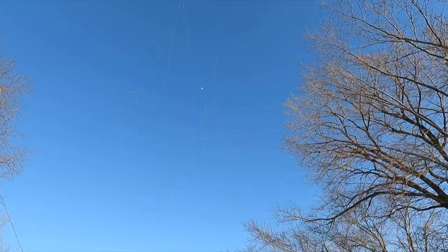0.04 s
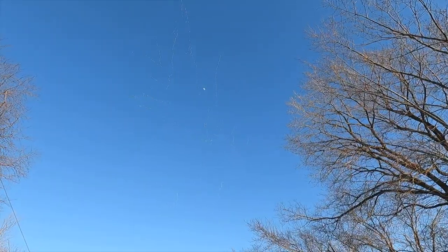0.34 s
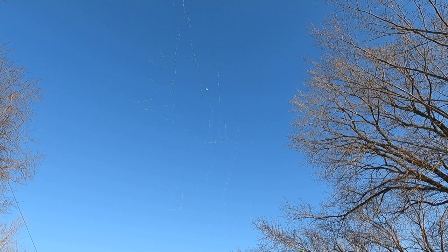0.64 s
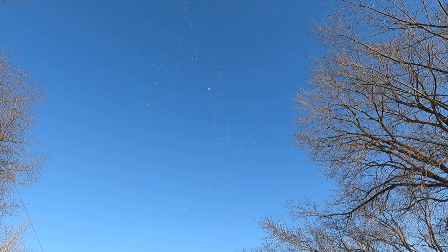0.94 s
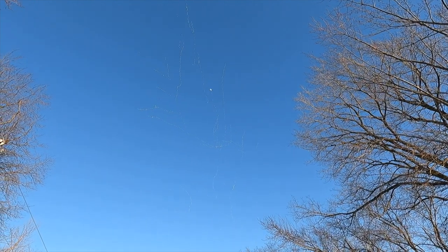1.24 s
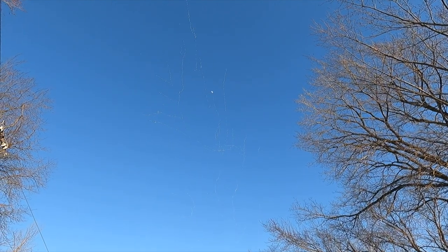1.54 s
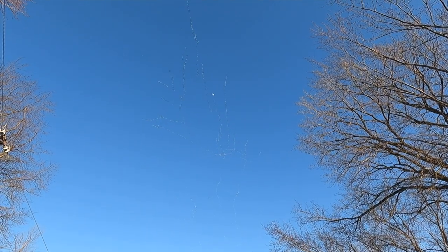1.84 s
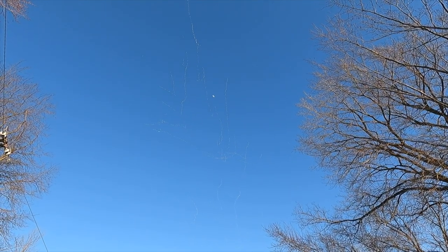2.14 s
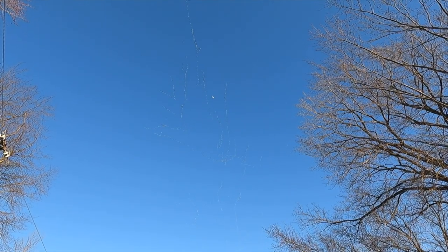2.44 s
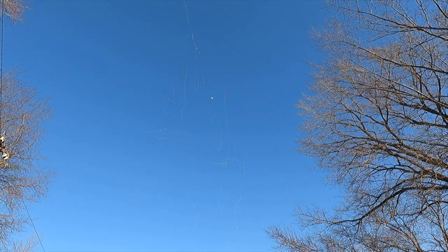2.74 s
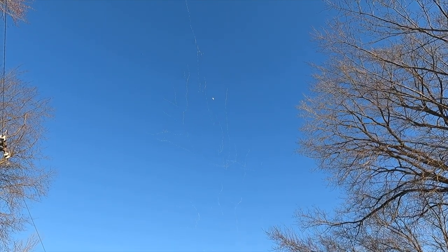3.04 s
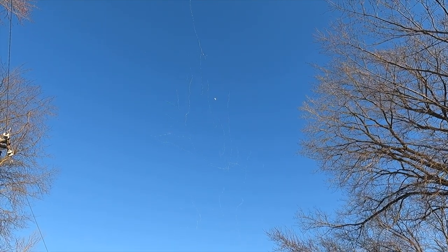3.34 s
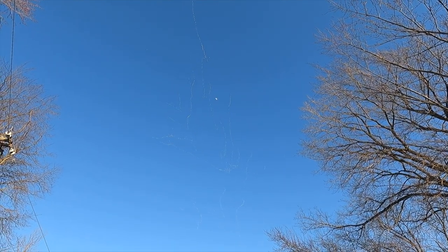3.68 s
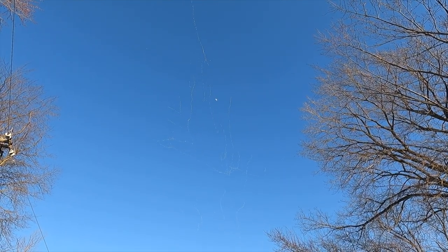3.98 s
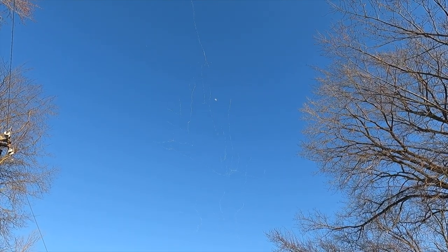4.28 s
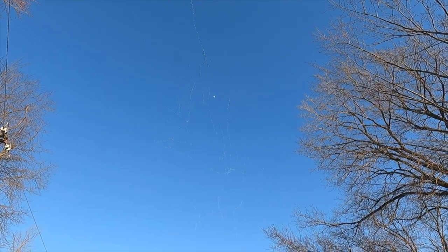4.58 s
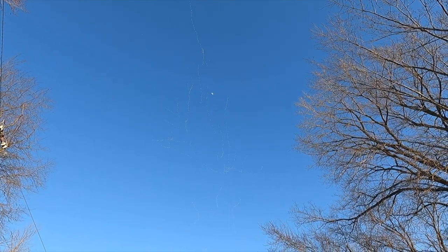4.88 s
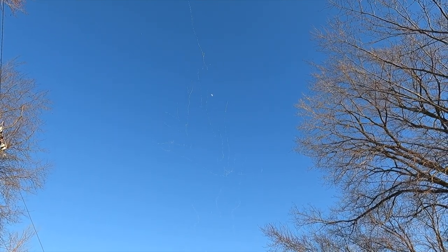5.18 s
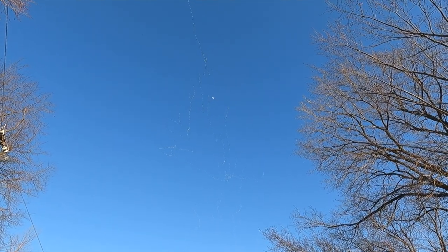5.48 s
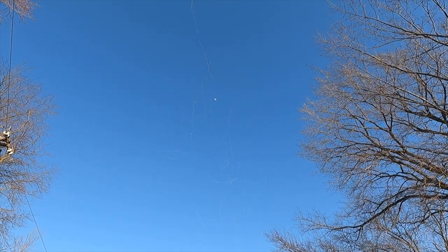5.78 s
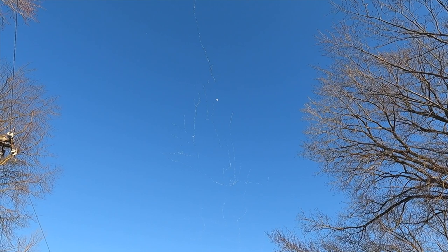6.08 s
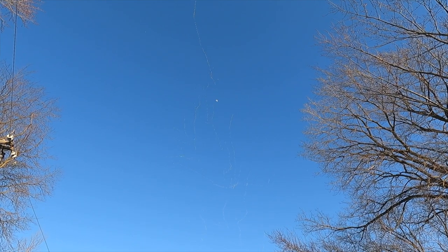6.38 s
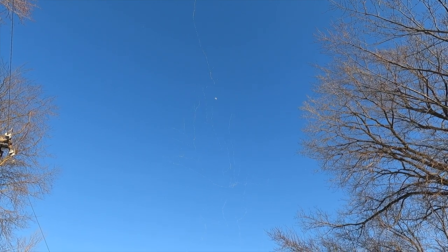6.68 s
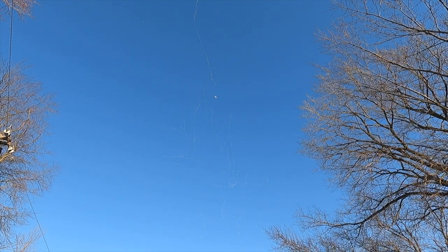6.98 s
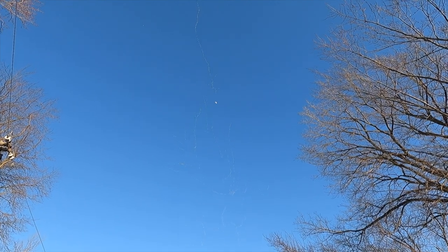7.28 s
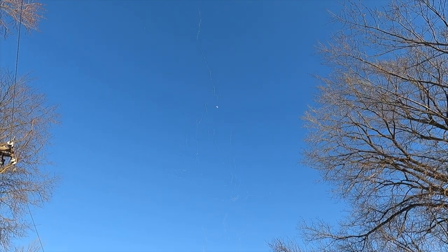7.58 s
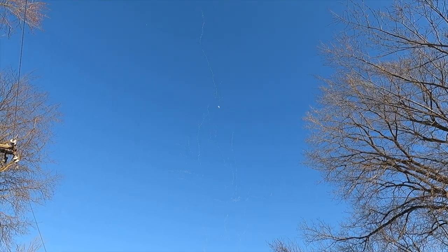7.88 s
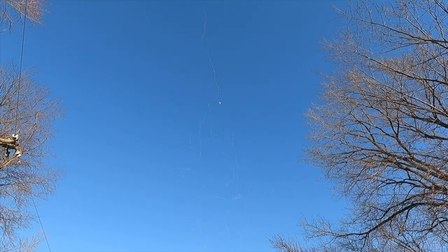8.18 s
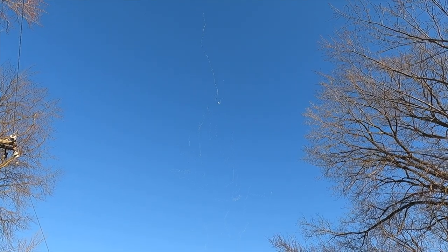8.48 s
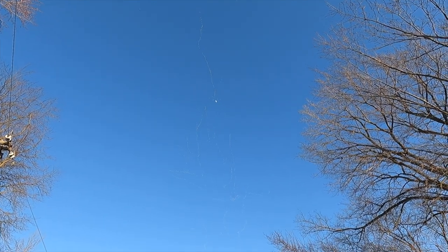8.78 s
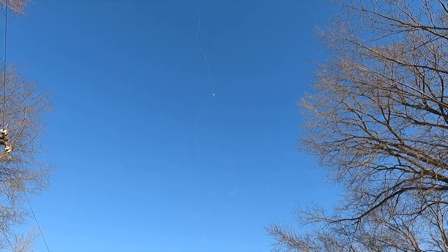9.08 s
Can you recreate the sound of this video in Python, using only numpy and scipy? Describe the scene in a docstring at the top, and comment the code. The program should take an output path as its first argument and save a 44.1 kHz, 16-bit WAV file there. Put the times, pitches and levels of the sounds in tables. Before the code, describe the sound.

Wind buffets the microphone with low, uneven rumbling as many geese honk above the trees.

```python
"""Geese over windy trees

A flock of geese passes high over bare trees, honking in overlapping calls; one voice cracks
into a clear high note. The trees scatter the calls, and the far birds blend into a gabble.
Wind buffets the microphone in lumps and hisses in the twigs, with one strong gust near the end."""
import sys
import numpy as np
from scipy import signal
from scipy.fft import rfft, irfft, next_fast_len
from scipy.io import wavfile
from scipy.ndimage import map_coordinates

SR = 44100
rng = np.random.default_rng(int(sys.argv[2]) if len(sys.argv) > 2 else 0)


def inscribe(sig):
    """Save sig as 16-bit PCM at rate SR to the path in sys.argv[1].

    A 1-D sig is mono; a 2-D sig holds one channel per row.
    Samples are clipped to [-1, 1] before scaling.
    """
    pcm = np.round(np.clip(np.atleast_2d(sig).T, -1, 1) * 32767)
    wavfile.write(sys.argv[1], SR, pcm.astype(np.int16))


N = 411453

# One row per nearby honk. Its crest is the top of its pitch; its partials are the tones stacked in it.
# level_db sets the second partial; fundamental_db shifts the first, reed_db the third to sixth.
# Columns: crest_s, rise_s, fall_s, crest_hz, bend_hz, level_db, fundamental_db, reed_db, roughness
HONKS = [(.01, 0.046, 0.033, 871, 19, -59.5, 4, 8, 0.42), (.183, 0.066, 0.058, 830, 30, -64, -13, -8, 0.72),
         (.28, 0.039, .03, 865, 25, -67, -8, -8, 0.14), (.385, .06, 0.067, 902, 70, -61, -4, -6, 0.25),
         (.455, 0.042, .08, 895, 80, -69, -2, -3, 0.5), (.655, 0.059, 0.046, 943, 58, -63.5, -7, -12, 0),
         (.86, 0.052, 0.03, 838, 10.6, -66, -17, -8, 0.23), (.915, 0.034, 0.14, 890, 36, -68, -2, -3, 0.48),
         (1.3, 0.048, .06, 910, 21.4, -66.5, 0.5, -10, 0.48),
         (1.49, 0.064, 0.064, 915, 40, -64.5, 7, 2, 0.34),
         (1.582, 0.039, 0.027, 898, 90, -61.5, -4.5, -3, 0.25),
         (1.64, .045, 0.038, 945, 70, -63.5, -2, -2, 0.33), (1.69, 0.029, .04, 655, 15, -68, -14, 2, .13),
         (1.77, .02, 0.029, 900, 70, -62, -4, 0, 0.2),
         (1.805, 0.046, 0.073, 953, 130, -63.5, -4.5, -1, 0.2),
         (1.85, .02, 0.03, 770, 33, -66, -5, 3, 0.34), (1.95, .05, .07, 887, 70, -64.5, -1, 1, 0.37),
         (2.02, .02, .025, 765, 14, -64, -4, 4, 0.2), (2.06, .03, 0.033, 587, 29, -65.5, -16, -5, 0.49),
         (2.46, .06, .04, 887, 38, -71, 6, 2, .25), (2.555, .03, 0.037, 890, 100, -65.5, -4, 4, .15),
         (2.625, 0.04, .03, 945, 110, -65.5, -4, 3, 0.2), (2.864, .035, .025, 953, 100, -66, -10, -6, 0),
         (2.96, 0.06, 0.063, 935, 72, -57, -2.5, -3, 0.3), (3.055, .04, 0.074, 905, 34, -69, 3, -5, 0.28),
         (3.21, 0.054, 0.052, 885, 146, -65.5, -12, -13, 0.3),
         (3.27, 0.027, 0.03, 810, 24, -71, -10, -4, 0.2),
         (3.41, 0.066, 0.075, 868, 75, -65.5, 2.5, -10, 0.34),
         (3.63, 0.04, .012, 897, 91, -56, -0.5, 0, 0.25), (3.815, .08, 0.077, 971, 50, -66, 4, 6, 0.59),
         (4.072, 0.021, 0.023, 640, 15, -68.5, -16, -4, 0.2),
         (4.177, 0.066, 0.061, 960, 106, -54.5, -7, -3, 0.13),
         (4.245, .025, 0.026, 850, 42, -67, -7, 4, .3), (4.485, 0.097, .06, 932, 114, -63.5, -6, -2, 0.2),
         (5.003, 0.041, 0.037, 935, 90, -61.5, -3, -1, .2), (5.05, 0.024, 0.052, 895, 56, -65, 1, 1, 0.14),
         (5.15, 0.052, .04, 875, 22, -66, -6, -4, 0.16), (5.178, 0.019, 0.019, 850, 15, -69, 7.5, -4, 0.03),
         (5.238, .02, .03, 750, 10, -72, -6, -4, .1), (5.355, 0.061, 0.063, 957, 100, -60.5, -11, -3, 0.18),
         (5.49, 0.048, .05, 924, 53, -66.5, -5, -2, .35), (5.83, 0.039, .055, 905, 5, -66.5, -9, -2, 0.1),
         (5.903, 0.032, 0.039, 1020, 74, -67.5, 4.5, -2, 0.2),
         (5.995, .055, 0.053, 982, 27, -66, -5, -1, 0.14), (6.09, 0.053, 0.058, 885, 21, -63, -3, -5, 0.56),
         (6.21, .05, 0.028, 925, 45, -64, -4, -4, .1), (6.275, .035, .075, 955, 29, -66.5, -2, -5, 0.16),
         (6.345, 0.047, 0.062, 870, 67, -59.5, -1, -8, 0.32),
         (6.41, 0.029, .03, 815, 34.5, -62.5, 7, -4, 0.35), (6.5, 0.057, 0.027, 875, 46, -67, 9, 3, 0.42),
         (6.635, 0.063, 0.063, 928, 75, -60.5, -1.5, 3, 0.25),
         (7.025, 0.044, 0.057, 1020, 78, -62.5, 6, -6, 0.29),
         (7.075, 0.04, 0.048, 790, 21, -65, -3, 2, 0.28), (7.16, 0.019, 0.027, 593, 45, -63, -10, -3, 0.3),
         (7.19, 0.054, 0.053, 905, 42, -65.5, 0.5, -1, 0.35),
         (7.33, 0.049, 0.045, 1004, 70, -64.5, 1, -1, .1), (7.385, 0.041, 0.062, 820, 29, -69, -3, 4, 0.15),
         (7.657, 0.058, 0.069, 932, 88, -59.5, -13, -1, 0.28),
         (7.795, 0.053, 0.043, 976, 60, -68.5, 4, -2, 0.64),
         (8.095, .028, 0.063, 946, 81, -58, 0.5, 3, 0.33), (8.145, 0.04, 0.033, 990, 30, -63, -1, -2, 0.36),
         (8.215, .03, 0.04, 890, 32, -64, 1, 0, 0.23), (8.45, 0.052, 0.037, 945, 80, -74, 13, -1, 0.25),
         (8.652, .055, 0.059, 980, 106, -64, -11, -1, 0.1),
         (8.825, 0.059, 0.025, 995, 36, -61.5, -1, -3, .06),
         (8.882, .064, 0.031, 942, 80, -51.5, -5.5, -7, 0.17),
         (8.94, 0.029, .04, 920, 31, -67, -7, -5, 0.59), (9.05, 0.029, 0.03, 865, 10, -71, 1, -4, 0.06),
         (9.175, .02, 0.036, 885, 54, -68, -7, 2, 0), (9.255, 0.048, 0.03, 915, 60, -68, 3.5, 4, .26)]
# The throat's colour on a hoarse call. Columns: frequency_hz, level_db
RASP_SPECTRUM = [(400, -35), (750, -6.5), (950, 10), (1300, 2), (1700, 3.5), (2000, -0.5), (2300, -9.5),
                 (3000, -31), (9000, -82)]

def near_geese(voice_db=4.5, rasp_db=18, ground_db=-15):
    """The clearest birds, each heard again off the ground; the hoarsest calls break up into noise."""
    voices, hoarseness = np.zeros(N), np.zeros(N)
    for crest_s, rise_s, fall_s, crest_hz, bend_hz, level_db, fundamental_db, reed_db, rough in HONKS:
        rough = np.clip(rough, 0, 1)
        hz_per_s = bend_hz / max(rise_s, fall_s)  # the longer side of the call bends further
        start_hz, end_hz = crest_hz - hz_per_s * rise_s, crest_hz - hz_per_s * fall_s
        call, envelope = honk(rise_s, fall_s, start_hz, crest_hz, end_hz, fundamental_db, rough, reed_db)
        call = amp(level_db + voice_db) * call
        start_s = crest_s - 1.5 * rise_s  # a soft scoop comes ahead of the loud part
        add(voices, start_s, call)
        add(voices, start_s + rng.uniform(.005, .01), amp(ground_db) * call)
        add(hoarseness, start_s, amp(level_db + rasp_db) * rough ** 2.8 * envelope)
    return voices + hoarseness * noise(RASP_SPECTRUM)


# The second partial weakens as it climbs past the main resonance. Columns: frequency_hz, gain_db
MAIN_RESONANCE = [(1780, 0.5), (2050, -4.5)]
# How the throat's resonances shape the third to sixth partials. Columns: frequency_hz, gain_db
THROAT_RESONANCES = [(2100, -19.5), (2550, -19.5), (2850, -26), (3150, -28.5), (3650, -26.5), (3950, -30),
                     (4350, -24), (5000, -34.5), (6200, -42.5)]

def honk(rise_s, fall_s, start_hz, crest_hz, end_hz, fundamental_db, rough, reed_db,
         waver=.009, jitter=.04, flutter_db=7, fade_db=7, rattle=.55, growl=.85, growl_hz=215):
    """One call and its loudness curve: the pitch scoops up and sags, and the low ends are hoarsest."""
    t = np.arange(-1.5 * rise_s, 1.5 * fall_s, 1 / SR)
    size = len(t)
    away = np.abs(t) / np.where(t < 0, rise_s, fall_s)  # 0 at the crest, 1 at the loud part's edges
    rough = rough * (.9 + .5 * away ** 2)
    pitch_hz = crest_hz - (crest_hz - np.where(t < 0, start_hz, end_hz)) * away ** 1.558
    pitch_hz -= 31.9 * away ** 3  # low air pressure drops both ends further
    pitch_hz *= 1 + waver * wobble(80.9, size) + jitter * rough * wobble(262.3, size)
    phase = phase_of(pitch_hz)
    partials_db = [fundamental_db, along(MAIN_RESONANCE, 2 * pitch_hz)]
    partials_db += [along(THROAT_RESONANCES, k * pitch_hz) + reed_db for k in range(3, 7)]
    # a second, slower vibration puts a growling side tone under each partial
    growl_phase = phase_of(growl_hz * (1 + .15 * wobble(60, size)))
    side_tone = growl * rough * np.exp(-1j * growl_phase)
    voice = np.zeros(size)
    for k, level_db in enumerate(partials_db, start=1):
        # uneven beats of the voice's membrane smear each partial into noise, the high ones most
        smear = rattle * rough * k / 2 * (wobble(450, size) + 1j * wobble(450, size))
        # swirling air makes each partial flicker, the high ones most
        flicker = amp((2 if k < 3 else 4) * wobble(51, size))
        partial = np.real((1 + smear + side_tone * min(k, 2) / 2) * np.exp(1j * k * phase))
        voice += amp(level_db) * unit(flicker * partial)
    to_edge_s = np.minimum(t - t[0], t[-1] - t)
    envelope = amp(-fade_db * away ** 2.5) * np.minimum(to_edge_s / .014, 1)
    flutter = unit(amp(flutter_db * np.minimum(rough, .6) * wobble(155, size)))
    return voice * envelope * flutter, envelope


# The path of the one high note. Columns: time_s, pitch_hz, level_db
CRACKED_NOTE = [(3.625, 1480, -70), (3.642, 1457, -47), (3.675, 1506, -46), (3.697, 1554, -55),
                (3.708, 1440, -48), (3.728, 1230, -65), (3.76, 1190, -90)]

def cracked_note(octave_db=-33, low_voice_db=-28, waver=.0049):
    """One voice jumps up to an almost pure tone, with a trace of its low voice between the partials."""
    pitch_hz, level_db = curves(CRACKED_NOTE)
    t = np.arange(N) / SR
    phase = phase_of(pitch_hz * (1 + waver * wobble(200)))
    sounding = (t > CRACKED_NOTE[0][0]) & (t < CRACKED_NOTE[-1][0])
    tone = np.sin(phase) + amp(low_voice_db) * np.sin(1.5 * phase) + amp(octave_db) * np.sin(2 * phase)
    return amp(level_db) * sounding * unit(tone)


# How the distant gabble swells and fades. Columns: time_s, level_db
FLOCK_LEVELS = [(0.0, -63.5), (1.3, -70), (1.74, -62.5), (2.26, -72), (3.01, -65), (5.22, -68.5),
                (5.69, -73.5), (6.24, -64.5), (6.73, -67.5), (8.94, -65.5), (9.33, -81)]

def far_geese(count=130, typical_hz=900, spread=.055, gain_db=-.5):
    """The rest of the flock: many weak calls, each with its own pitch and length."""
    gabble = np.zeros(N)
    for i, (when, rise, fall, rough) in enumerate(rng.random((count, 4))):
        crest_hz = typical_hz * np.exp(spread * rng.triangular(-6, 0, 1.5))
        call, _ = honk(.04 + .0401 * rise, .04 + .04 * fall, .88 * crest_hz, crest_hz, .84 * crest_hz,
                       fundamental_db=-2.5, rough=.22 + .37 * rough, reed_db=0)
        add(gabble, (i + when - 1) / count * N / SR, call)
    return amp(curves(FLOCK_LEVELS)[0] + gain_db) * unit(gabble)


# How long the echo takes to fade by 60 dB. Columns: frequency_hz, fade_s
ECHO_TIMES = [(500, 0.12), (1800, 0.59), (5000, 0.35)]

def woodland_echo(calls):
    """Trunks and ground scatter the calls into a soft tail."""
    hz, t, spectra = signal.stft(rng.standard_normal(SR), SR, nperseg=256)
    decay = amp(-60 * t / along(ECHO_TIMES, hz)[:, None])
    _, tail = signal.istft(spectra * decay, SR, nperseg=256)
    return signal.fftconvolve(calls, tail / np.linalg.norm(tail))[:N]


# The breeze at the microphone, between gusts. Columns: time_s, rumble_db, buffet_db
BREEZE_LEVELS = [(0, -36, -45), (1, -38.5, -44.5), (1.6, -41, -48.5), (3.4, -40.5, -45), (4.1, -45.5, -48),
                 (4.6, -36.5, -43.5), (5.7, -43, -45.5), (6.2, -36.5, -42.5), (7.25, -42, -49.5),
                 (7.6, -35, -35.5), (7.85, -31.5, -38.5), (7.97, -37, -45), (8.02, -33, -40),
                 (8.5, -34.5, -43), (8.7, -37, -47.5), (9.33, -33, -37.5)]
# The colours of the deep rumble and of the flapping buffet above it. Columns: frequency_hz, level_db
RUMBLE_SPECTRUM = [(8, -28), (22, -0.5), (42, 3), (70, -2), (105, -3), (160, -23), (400, -89.5)]
BUFFET_SPECTRUM = [(50, -21), (110, 1), (200, -2), (300, -12.5), (450, -23), (800, -45), (1500, -64.5),
                   (4000, -120)]

def microphone_wind():
    """Air swirls at the microphone: each lump swells the rumble and, more sharply, the buffeting."""
    rumble_db, buffet_db = curves(BREEZE_LEVELS) + gusts()
    lumps = wobble(40)
    rumble = unit(amp(2 * lumps) * noise(RUMBLE_SPECTRUM))
    buffet = unit(amp(3 * lumps) * noise(BUFFET_SPECTRUM))
    return amp(rumble_db + .5) * rumble + amp(buffet_db) * buffet


# Gusts on top of the breeze. Columns: peak_s, length_s, rumble_rise_db, buffet_rise_db
GUSTS = [(0.32, 0.033, 7.5, 6), (0.844, 0.1, 0, 3.5), (1.192, 0.036, 8, 3.5), (2.14, 0.16, 5, 1),
         (3.816, 0.2, 8, 3), (4.367, 0.094, 5.5, 0), (4.66, 0.099, 1.5, 6), (4.901, 0.1, 6, 5.5),
         (6.05, 0.082, 3.5, 4.5), (6.897, 0.14, 5, 4), (7.401, 0.12, -1, 9.5), (7.738, 0.047, 9, 4.5),
         (8.271, 0.42, 8, 8)]

def gusts():
    """Each gust swells and dies smoothly; gives the decibels added to the rumble and the buffeting."""
    t = np.arange(N) / SR
    return sum(np.outer(rises_db, np.exp(-np.abs(2 * (t - peak_s) / length_s) ** 3 / 2))
               for peak_s, length_s, *rises_db in GUSTS)


# Single whirls of air that hit the microphone. Columns: time_s, relative_level_db
EDDIES = [(0.303, -25.5), (0.562, -31.5), (2.17, -32.5), (3.296, -32), (4.636, -28.5), (4.948, -26.5),
          (6.016, -26), (6.17, -29.5), (7.104, -32.5), (7.424, -25.5), (7.718, -25), (8.0, -22),
          (8.292, -23.5), (8.424, -24.5)]

def eddies(delay_s=.00466, gain_db=3, centre_hz=155):
    """Each eddy gives one short push of pressure between two shallow dips."""
    bumps, t = np.zeros(N), np.arange(-.015, .015, 1 / SR)
    angle = np.pi * centre_hz * t
    push = (1 - 2 * angle ** 2) * np.exp(-angle ** 2)
    for time_s, level_db in EDDIES:
        add(bumps, time_s + delay_s + t[0], amp(level_db + gain_db) * push)
    return bumps


# How the wind in the treetops swells and fades. Columns: time_s, level_db
TREE_WIND_LEVELS = [(0, -59.5), (.9, -62.5), (2.35, -64.5), (2.9, -63), (4.83, -61.5), (5.4, -62.5),
                    (6.4, -59.5), (7.25, -60), (7.7, -56.5), (7.95, -57.5), (8.2, -53.5), (9.0, -55.5),
                    (9.33, -55)]
# The colours of the treetops' rush and of the twigs' hiss. Columns: frequency_hz, level_db
RUSH_SPECTRUM = [(100, -29), (300, 3.5), (480, 1.5), (660, -2.5), (850, 1.5), (1050, -5), (1300, -14.5),
                 (1900, -20.5), (2300, -24), (3500, -30), (9000, -100)]
HISS_SPECTRUM = [(1000, -7), (2500, -2), (4000, 3.5), (5500, 5), (8000, 0), (10000, -5.5), (12000, -15),
                 (13500, -19.5)]

def tree_wind(rush_gain_db=3.5, sway_db=1.2, mean_hiss_db=-74, hiss_follows=.57):
    """Air rushes through the treetops; the hiss of the twigs follows it more gently."""
    rush_db, = curves(TREE_WIND_LEVELS)
    hiss_db = mean_hiss_db + hiss_follows * (rush_db - rush_db.mean())
    rush = amp(rush_db + rush_gain_db + sway_db * wobble(7)) * noise(RUSH_SPECTRUM)
    hiss = amp(hiss_db + .81 * wobble(16)) * noise(HISS_SPECTRUM)
    return rush + hiss


def amp(db):
    """Turn decibels into a multiplier."""
    return 10 ** (np.asarray(db) / 20)


def unit(x):
    """Scale to an average strength (rms) of 1."""
    return x / np.sqrt(np.mean(x ** 2) + 1e-20)


def phase_of(pitch_hz):
    """Add up a changing pitch into the angle of its wave."""
    return 2 * np.pi * np.cumsum(pitch_hz) / SR


def along(points, hz):
    """Read between (frequency_hz, value) points on a log frequency scale."""
    point_hz, values = np.transpose(points)
    return np.interp(np.log(hz + 1), np.log(point_hz + 1), values)


def curves(rows):
    """One value per sample for each column after the time."""
    times_s, *columns = np.transpose(rows)
    return [np.interp(np.arange(N) / SR, times_s, column) for column in columns]


def wobble(rate, size=N):
    """A smooth curve through `rate` random points a second."""
    points = rng.standard_normal(int(size * rate / SR) + 4)
    return map_coordinates(points, [np.arange(size) * rate / SR])


def filtered(x, response):
    """Scale each frequency in x by response(hz)."""
    size = next_fast_len(N + SR // 2)
    return irfft(rfft(x, size) * response(np.fft.rfftfreq(size, 1 / SR)), size)[:N]


def noise(spectrum):
    """Noise of strength 1 with the given colour."""
    return unit(filtered(rng.standard_normal(N), lambda hz: amp(along(spectrum, hz))))


def add(track, start_s, sound):
    """Mix a sound into the track, dropping what falls outside it."""
    at = round(start_s * SR)
    sound = sound[max(-at, 0):max(N - at, 0)]
    track[max(at, 0):][:len(sound)] += sound


def scene():
    """Geese overhead, their echo, and the wind; the far birds arrive mostly as echo."""
    near, far, crack = near_geese(), far_geese(), cracked_note()
    echo = woodland_echo(amp(-9.5) * near + far + amp(-8.5) * crack)
    return (near + crack + amp(-6) * far + echo + microphone_wind() + eddies() + tree_wind())[None]


def record(dry):
    """The sound starts and stops softly, and the very highest treble is cut away."""
    fade_s, top_hz = .004, 13400
    fade = np.minimum(np.arange(N) / SR / fade_s, 1)
    return filtered(dry[0] * fade * fade[::-1], lambda hz: hz < top_hz)[None]


dry = scene()
out = record(dry)
inscribe(out)
```